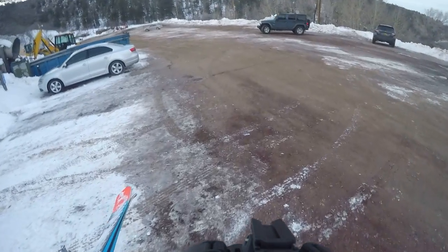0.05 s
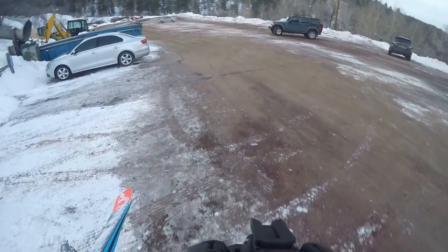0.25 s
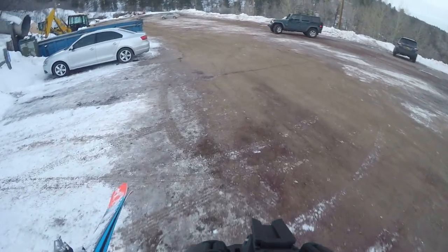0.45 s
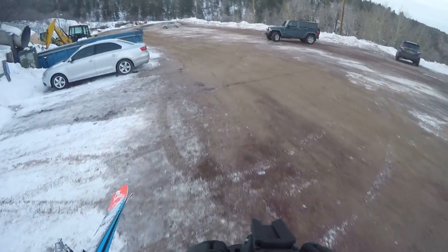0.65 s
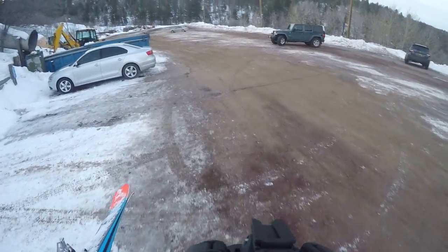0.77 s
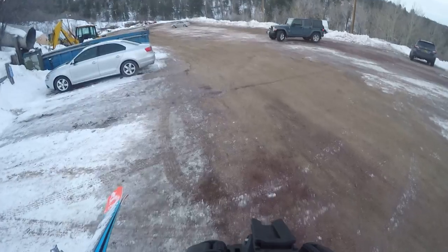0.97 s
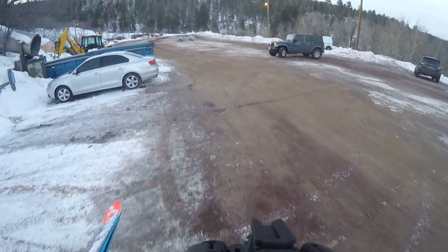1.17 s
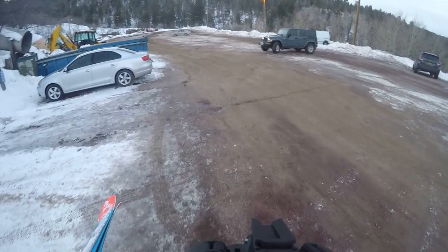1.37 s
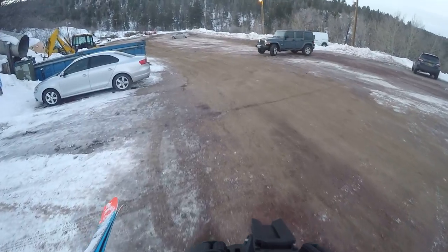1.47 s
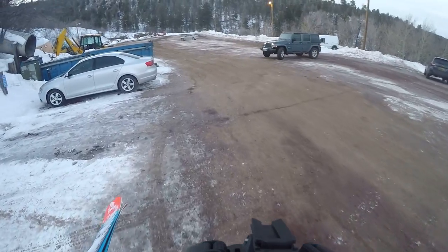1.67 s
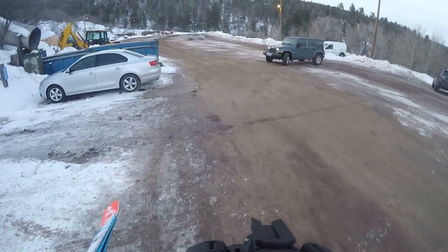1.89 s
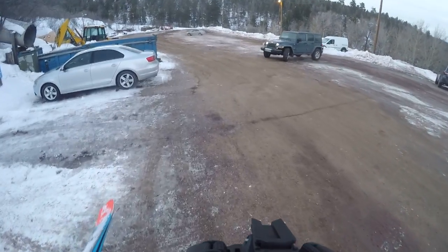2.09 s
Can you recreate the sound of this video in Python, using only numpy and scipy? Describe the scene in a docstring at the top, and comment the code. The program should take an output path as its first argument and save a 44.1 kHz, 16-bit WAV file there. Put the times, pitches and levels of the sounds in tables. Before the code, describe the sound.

Six low, booming footfalls at an even walking pace, heard from a camera worn on the body; soft gravel crunch grows after the first second, with squeaky plastic creaks, dull knocks and ticks over faint wind and hiss.

```python
"""Heavy boots walk over icy gravel, each footfall a deep thud that shakes a chest-worn, housed camera.
Thuds are slow flattened swings; gear knocks ring the mount's modes and its joint creaks in tone bursts.
Hard ticks ring the plastic shell, and gravel grains crunch, muffled, through the housing resonances.
Beneath lie the swell and ebb of body sway (low noise bands) and steady coloured noise for wind and hiss."""
import sys
import numpy as np
from scipy import signal
from scipy.fft import rfft, irfft
from scipy.io import wavfile

SR = 44100
rng = np.random.default_rng(int(sys.argv[2]) if len(sys.argv) > 2 else 0)


def to_wav(sig):
    """Store sig (one row per channel, or 1-D mono) as 16-bit WAV at the path in sys.argv[1].

    Samples outside -1..1 are clipped; the rate is SR.
    """
    pcm = np.clip(np.atleast_2d(sig), -1, 1) * 32767
    pcm = np.round(pcm).astype(np.int16)
    wavfile.write(sys.argv[1], SR, pcm.T)  # frames by channels


def ratio_of_db(decibels):
    """Turn decibels (scalar or array-like) into linear amplitude factors; 0 dB maps to 1."""
    return 10 ** (np.asarray(decibels, float) / 20)


N = 94153  # length in samples

# Footfalls shaking the mount; the time and pitch are those of the deepest inward swing,
# rise and fall the times to 1/e: time_s, peak_db, pitch_hz, rise_s, fall_s
FOOTFALLS = [(0.015, -21.5, 29.3, 0.026, 0.042), (.445, -26, 29.1, 0.04, 0.065),
             (0.88, -19, 29.7, 0.032, 0.031), (1.317, -27, 29.8, .038, .028),
             (1.723, -24.5, 27.9, 0.031, 0.044), (2.152, -27, 29, 0.029, .04)]
# Gear knocking the chest mount; level before mode levels and trim, brightness above 98 Hz:
# start_s, level_db, brightness_db_per_octave
GEAR_KNOCKS = [(.412, -50, -6), (0.85, -38, -7), (1.189, -23, 1), (1.222, -34, -11), (1.615, -35.5, 0),
               (1.944, -32, -2.5), (1.975, -40, -5), (2.11, -43.5, 4)]
# Ringing modes of the mount: pitch_hz, relative_level_db, t60_s, delay_s
MOUNT_MODES = [(100.1, -5, 0.22, 0.0023), (126.8, -4, 0.078, 0.00284), (204, -11.5, 0.029, 0.0022),
               (357, -13, 0.012, 0.0014), (570, -6.5, 0.014, 0.00062), (910, -15.5, 0.0091, 0.00067),
               (1500, -15, 0.019, 0.00074), (2100, -18, 0.0088, 0.00054), (2930, -23, .008, 0.00059)]
# Slips of the plastic joint: peak_time_s, peak_db, pitch_hz
JOINT_SLIPS = [(0.0244, -40.5, 1550), (0.054, -45.5, 1480), (.090, -42, 1520), (.141, -51.5, 1600),
               (0.449, -44, 1600), (0.482, -47.5, 1450), (.601, -54, 1550), (.790, -49, 1500),
               (.897, -49, 1600), (.978, -54, 1780), (1.0034, -48, 1600), (1.0177, -49, 1240),
               (1.025, -49.5, 1220), (1.038, -51.5, 1580), (1.1015, -45.5, 1650), (1.1146, -50, 1650),
               (1.3253, -46.5, 1650), (1.347, -36.5, 1567), (1.3563, -51, 1600), (1.3897, -49, 1740),
               (1.399, -47, 1800), (1.41, -43.5, 1520), (1.43, -45.5, 1650), (1.4657, -44.5, 1410),
               (1.490, -50, 1450), (1.6987, -40, 1470), (1.7483, -44, 1500), (1.7535, -41, 1500),
               (1.7563, -37, 1580), (1.76, -51, 1630), (1.7699, -46, 1560), (1.776, -35.5, 1590),
               (1.784, -36, 1520), (1.7955, -34, 1600), (1.8301, -44, 1800), (1.9047, -50.5, 1850),
               (2.0917, -54, 1700), (2.1013, -47, 1470), (2.124, -47, 1500)]
# Hard ticks on the housing; level before mode levels and trim, positive tilt favours low modes,
# spacing before random spread: start_s, level_db, tilt_db_per_octave, touch_spacing_s
HOUSING_TICKS = [(0.1586, -55, -7.5, 0.00056), (.309, -49.5, 5.5, 0.0016), (0.3251, -46, -2.5, 0.00061),
                 (.469, -49.5, 4.5, 0.0017), (0.8407, -38, -2.5, 0.00095), (0.852, -46.5, 2, 0.00093),
                 (1.277, -52, -2, 0.00064), (1.302, -53, 5, 0.00061), (1.377, -57, -1, 0.00074),
                 (1.597, -56, -1, .002), (1.8198, -41, -3, 0.00074)]
# Ringing modes of the plastic shell: pitch_hz, relative_level_db, t60_s
SHELL_MODES = [(416, -8, 0.0041), (840, -12, 0.0038), (1450, 0, 0.0057), (2100, 1, 0.0042),
               (2880, 5, 0.0062), (3700, -13.5, 0.0047), (4740, -5.5, 0.0023), (5500, -9, 0.0042),
               (5900, -7, 0.0061)]
# Gravel under the sole, levels before the crunch trim: time_s, low_crunch_db, high_crunch_db
GRAVEL_LEVELS = [(0, -63.5, -65.5), (.1, -66, -69.5), (.19, -70.5, -70.5), (.38, -69.5, -70),
                 (.43, -59.5, -69.5), (.5, -68.5, -68), (.56, -68, -67), (.76, -69, -67.5),
                 (.8, -63.5, -66.5), (.86, -59, -64), (.885, -64.5, -68), (.92, -58.5, -65.5),
                 (1.02, -55, -64.5), (1.07, -62, -64.5), (1.12, -58.5, -70), (1.17, -61, -67),
                 (1.215, -64, -75), (1.265, -59.5, -61), (1.3, -62, -66.5), (1.4, -59.5, -64.5),
                 (1.47, -64.5, -65.5), (1.56, -67, -69.5), (1.6, -65, -66.5), (1.65, -69.5, -70),
                 (1.695, -59, -61.5), (1.725, -64, -75), (1.76, -59, -61.5), (1.81, -67, -66),
                 (1.83, -58.5, -62.5), (1.91, -60.5, -60.5), (2.04, -63.5, -63), (2.13, -59, -60)]
# Housing resonances in the low and the high crunch; width is that of the narrower of two passes:
# pitch_hz, width_hz, relative_level_db
LOW_RESONANCES = [(970, 450, -13.5), (1450, 245, -7), (1650, 190, -4), (1850, 290, -6)]
HIGH_RESONANCES = [(2230, 440, 6), (2926, 850, -4), (3530, 350, 3.5), (5070, 900, -7)]
# Body sway on the mount, level of each noise band: time_s, deep_db, mount_mode_db
SWAY_LEVELS = [(0, -40, -57), (.2, -49, -68.5), (.35, -42, -63), (.45, -29, -58.5), (.57, -50.5, -62),
               (.7, -50.5, -70), (.8, -38, -68), (.9, -28, -57), (1, -43.5, -76), (1.13, -51, -66),
               (1.24, -35.5, -58.5), (1.4, -45, -62), (1.55, -44.5, -71), (1.65, -38.5, -57.5),
               (1.8, -36.5, -67.5), (1.92, -46.5, -74), (2.0, -41, -60.5), (2.13, -44.5, -66)]
# Colour of the wind and microphone hiss: frequency_hz, relative_level_db
AIR_COLOUR = [(88, -33), (150, -24.5), (268, -2.5), (301, -5.5), (331, -3), (1280, -11.5), (2110, -15),
              (2880, -5), (3630, -10), (4490, -13.5), (15200, -24)]

THUD_SQUASH = 0.87  # drive that flattens the ends of the swing
THUD_SAG_HZ_PER_S = 38  # pitch drop after the deepest swing
CREAK_RISE_S, CREAK_FALL_S = 0.00091, 0.0016  # to 1/e
TICK_CUT_HZ = 5650
GRAINS_PER_S = 2600  # on average
GRAIN_SPREAD_DB = 3  # scale of the random grain sizes
OWN_GRAIN_DB = 3  # how unevenly one grain reaches the resonances
CRUNCH_TRIM_DB = 0.7
AIR_RMS_DB = -65.5


def rms_one(x):
    """Scale to rms 1."""
    return x / np.sqrt(np.mean(x ** 2) + 1e-20)


def in_time(rows):
    """Draw the columns of a timed curve out per sample."""
    s, *columns = np.transpose(rows)
    return [np.interp(np.arange(N) / SR, s, column) for column in columns]


def clicks_at(s, gain):
    """Add single-sample clicks at the given times."""
    out = np.full(N, 1e-18)
    index = np.clip((np.asarray(s) * SR).astype(int), 0, N - 1)
    np.add.at(out, index, gain)
    return out


def ring(clicks, hz, t60):
    """A unit click sets a decaying sine of starting height 1 ringing."""
    radius = ratio_of_db(-60 / (t60 * SR))
    angle = 2 * np.pi * hz / SR
    return signal.lfilter([0, np.sin(angle)], [1, -2 * radius * np.cos(angle), radius ** 2], clicks)


def resonance(x, hz, width_hz):
    """Two-pole band-pass with a gain of about 1 at its top."""
    radius = np.exp(-np.pi * width_hz / SR)
    zeros = np.array([1, 0, -1]) * (1 - radius ** 2) / 2
    poles = [1, -2 * radius * np.cos(2 * np.pi * hz / SR), radius ** 2]
    return signal.lfilter(zeros, poles, x)


def band(low_hz, high_hz):
    """Band-passed noise at rms 1, its first second dropped to let the filter settle."""
    sos = signal.butter(2, [low_hz, high_hz], "band", fs=SR, output="sos")
    return rms_one(signal.sosfilt(sos, rng.standard_normal(N + SR))[SR:])


def thuds():
    """Each footfall is a few swings that swell, slow down and die, flattened at their ends."""
    out = 0
    for s, db, hz, rise, fall in FOOTFALLS:
        t = np.arange(N) / SR - s
        turns = hz * t - THUD_SAG_HZ_PER_S * np.clip(t, 0, 0.2) ** 2 / 2
        envelope = np.exp(-(t / np.where(t < 0, rise, fall)) ** 2)
        swing = -np.cos(2 * np.pi * turns) * envelope
        out = out + ratio_of_db(db) * np.tanh(THUD_SQUASH * swing) / np.tanh(THUD_SQUASH)
    return out


def knocks():
    """Inward blows ring the mount's modes, each after its delay; bright blows favour the upper ones."""
    s, db, bright_db = np.transpose(GEAR_KNOCKS)
    out = 0
    for hz, mode_db, t60, delay in MOUNT_MODES:
        blow_db = db + mode_db - 5.5 + bright_db * np.log2(hz / 98)
        blows = clicks_at(s + delay, -ratio_of_db(blow_db))  # minus: inward
        out = out + ring(blows, hz, t60)
    return out


def creaks():
    """Each slip of the joint is a short round burst of tone."""
    s, db, hz = np.transpose(JOINT_SLIPS)[..., None]
    t = np.arange(-300, 400) / SR
    envelope = np.exp(-(t / np.where(t < 0, CREAK_RISE_S, CREAK_FALL_S)) ** 2)
    bursts = ratio_of_db(db) * envelope * np.sin(2 * np.pi * hz * t)
    return clicks_at(s + t + 0.5 / SR, bursts)  # half a sample, to round to the nearest


def ticks():
    """Four close touches, fading on average, ring the shell's modes with random strengths."""
    s, db, tilt_db, spacing = np.transpose(HOUSING_TICKS)[..., None]
    touch = np.arange(4)
    s = s + spacing * touch * rng.uniform(0.65, 1.257, (len(s), 4))
    chance_db = rng.normal(0, 3.4, (len(s), 4, len(SHELL_MODES)))
    rings = 0
    for k, (hz, mode_db, t60) in enumerate(SHELL_MODES):
        tilt = tilt_db * np.log2(2950 / hz)
        touch_db = db + mode_db - 4.5 - 0.95 * touch + tilt + chance_db[..., k]
        rings = rings + ring(clicks_at(s, ratio_of_db(touch_db)), hz, t60)
    return signal.sosfilt(signal.butter(4, TICK_CUT_HZ, fs=SR, output="sos"), rings)


def crunch():
    """Random gravel grains, each reaching all the housing resonances unevenly."""
    out = 0
    size_db = GRAIN_SPREAD_DB * np.minimum(rng.exponential(1, N), 4)
    sizes = ratio_of_db(size_db) * (rng.random(N) < GRAINS_PER_S / SR)
    for level_db, table in zip(in_time(GRAVEL_LEVELS), (LOW_RESONANCES, HIGH_RESONANCES)):
        layer = 0
        for hz, width_hz, db in table:
            unevenness = ratio_of_db(rng.normal(0, OWN_GRAIN_DB, N)) * rng.choice([-1, 1], N)
            grains = sizes * unevenness + 1e-18
            muffled = resonance(resonance(grains, hz, 2 * width_hz), hz, width_hz)
            layer = layer + ratio_of_db(db) * rms_one(muffled)
        out = out + ratio_of_db(level_db + CRUNCH_TRIM_DB) * rms_one(layer)
    return out


def sway():
    """Body sway shakes the mount: a deep noise band and one around its 100 Hz mode swell and ebb."""
    deep_db, mode_db = in_time(SWAY_LEVELS)
    return ratio_of_db(deep_db) * band(9.1, 23.3) + ratio_of_db(mode_db) * band(59, 114)


def air():
    """Wind and microphone hiss: steady noise coloured in its spectrum."""
    hz, db = np.transpose(AIR_COLOUR)
    f = np.maximum(np.fft.rfftfreq(N, 1 / SR), 1)
    colour = ratio_of_db(np.interp(np.log(f), np.log(hz), db))
    noise = irfft(rfft(rng.standard_normal(N)) * colour, N)
    return ratio_of_db(AIR_RMS_DB) * rms_one(noise)


def scene():
    """All sources summed at one microphone."""
    mix = thuds() + knocks() + creaks() + ticks() + crunch() + sway() + air()
    return mix[None]  # one channel


def top_cut(x):
    """Nothing passes above the cut-off."""
    return signal.sosfilt(signal.butter(12, 15310, fs=SR, output="sos"), x)


def record(dry):
    """The camera takes the microphone mix as it is."""
    return top_cut(dry)


dry = scene()
out = record(dry)
to_wav(out)
```